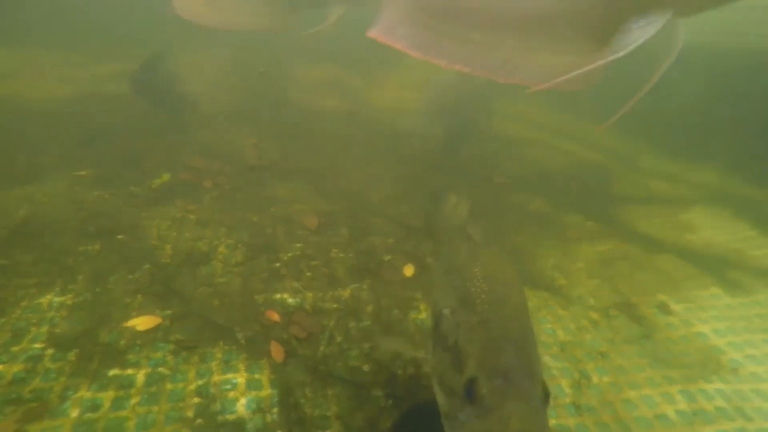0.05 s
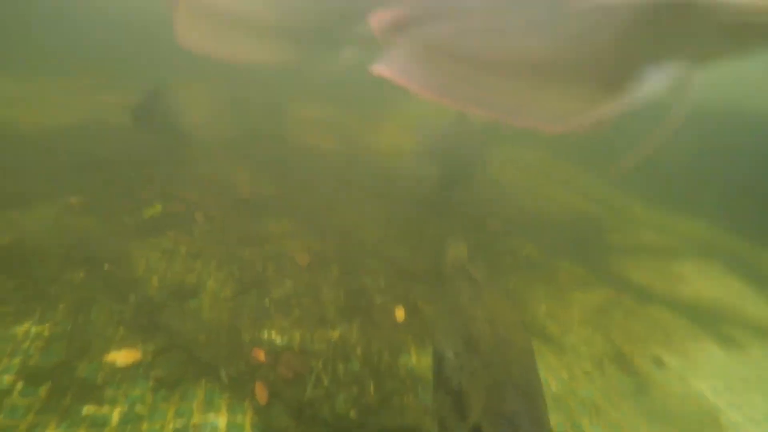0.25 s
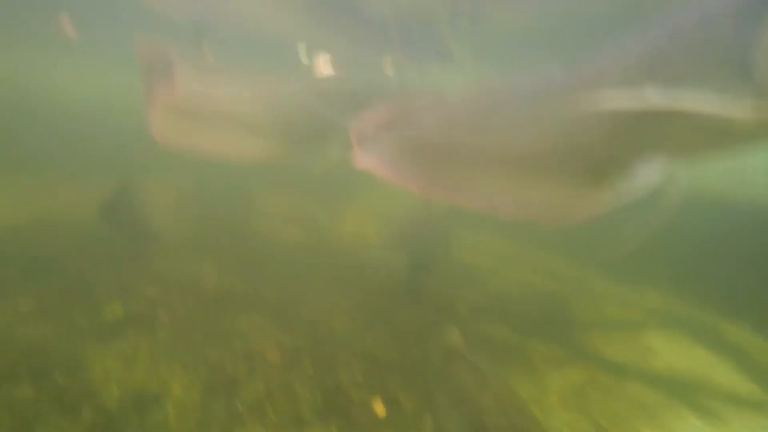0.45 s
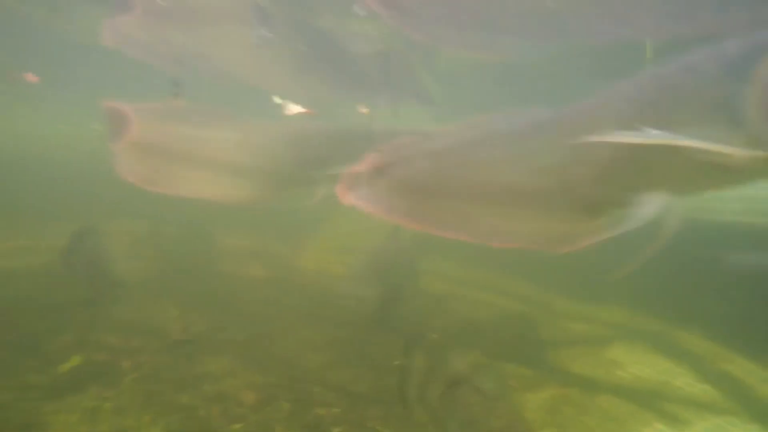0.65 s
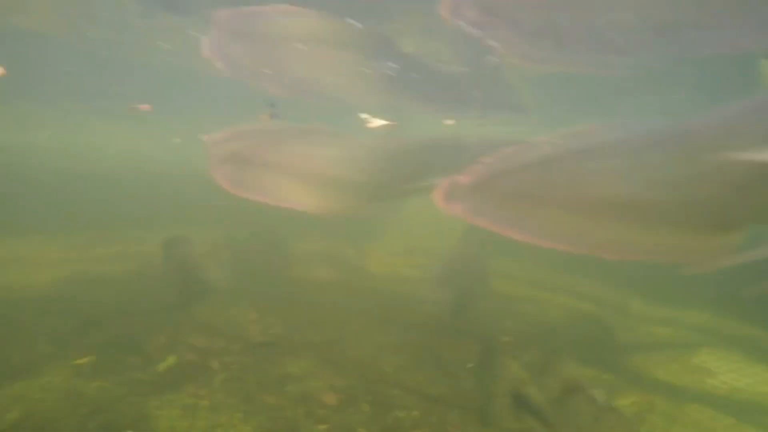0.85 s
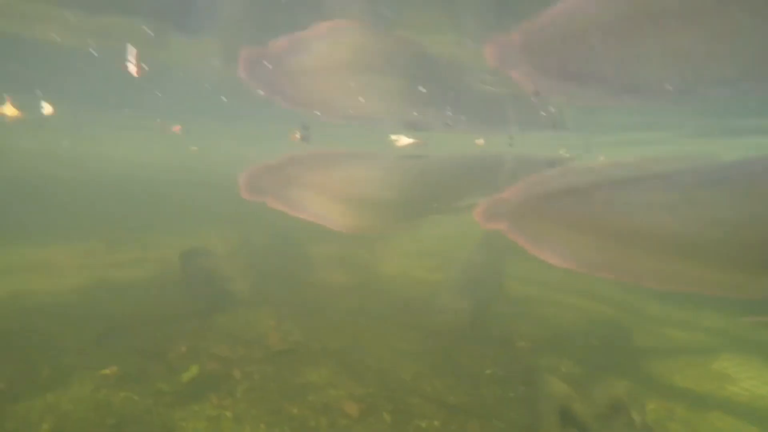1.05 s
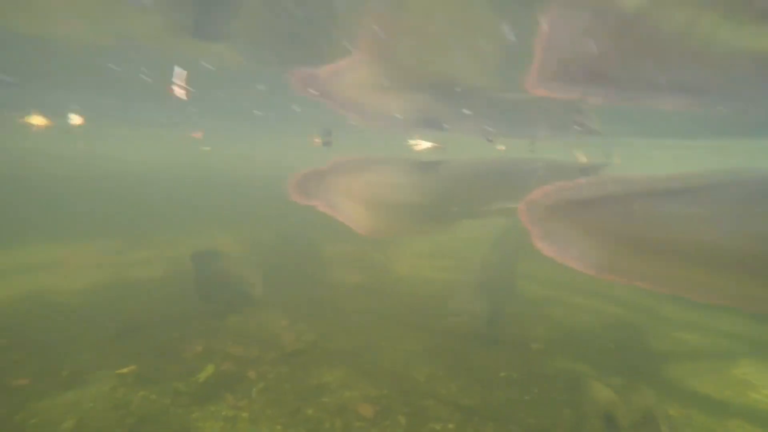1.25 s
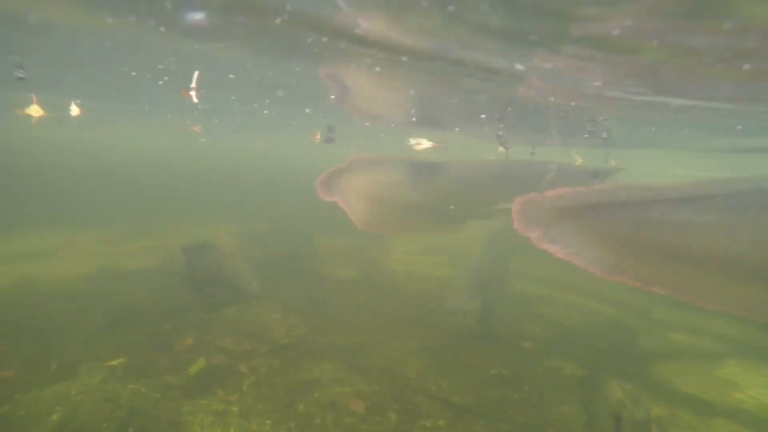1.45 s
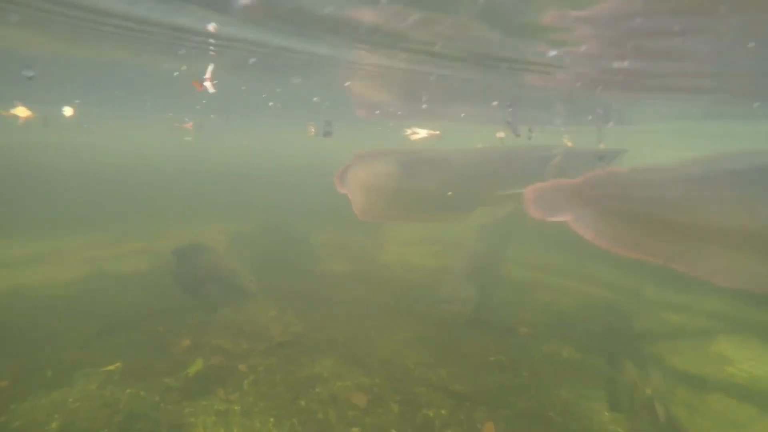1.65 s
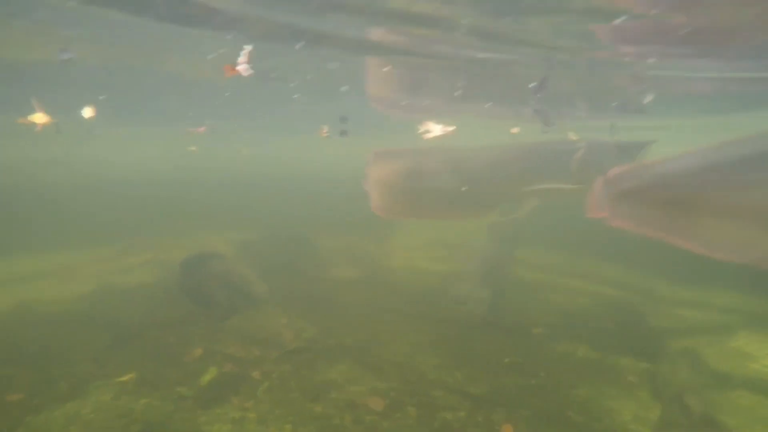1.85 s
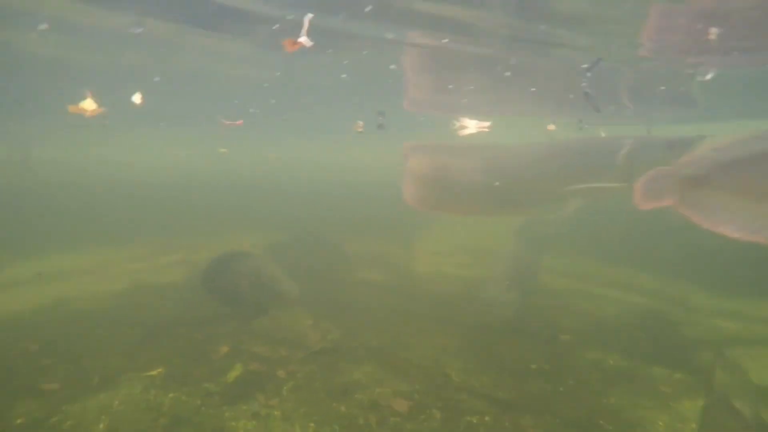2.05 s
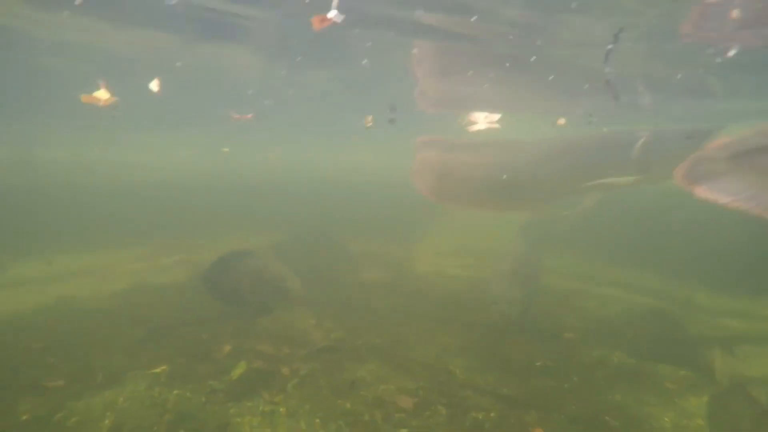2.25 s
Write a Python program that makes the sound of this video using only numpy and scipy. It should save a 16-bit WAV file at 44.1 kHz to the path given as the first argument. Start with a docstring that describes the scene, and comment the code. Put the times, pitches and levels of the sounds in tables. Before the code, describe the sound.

Underwater splashing hiss, narrow and watery, runs throughout a fish pond; a heavy low thump and a cluster of housing knocks, rubs and clicks come early, then sparse ticks, heard by a submerged camera, nearly mono.

```python
"""Under the surface of a fish pond, heard by a camera in a plastic housing, nearly mono.
Far-off splashing is a noise hiss shaped by the pond's narrow resonances, with swells of nearer splashes.
Water pushing the housing rumbles as low noise and shoves it into slow, dying swings.
While the camera is turned the mount knocks and slips, as dying modes, and rubs, as band-filtered grit.
A few sharp ticks ring bright modes; tiny bubbles are short fluttering sines."""
import sys
import numpy as np
from scipy import signal
from scipy.fft import rfft, irfft
from scipy.io import wavfile
from scipy.ndimage import uniform_filter1d

SR = 44100
rng = np.random.default_rng(int(sys.argv[2]) if len(sys.argv) > 2 else 0)


def inscribe(sig):
    """Save sig as 16-bit PCM at rate SR to the path in sys.argv[1].

    A 1-D sig is mono; a 2-D sig holds one channel per row.
    Samples are clipped to [-1, 1] before scaling.
    """
    pcm = np.round(np.clip(np.atleast_2d(sig).T, -1, 1) * 32767)
    wavfile.write(sys.argv[1], SR, pcm.astype(np.int16))


def boost(x):
    """Linear amplitude factor 10**(x/20) for a level x in decibels (scalar or array-like)."""
    u = np.asarray(x, float) / 20
    return 10 ** u


N = 101429  # length in samples

# relative spectrum of the splashing treble, far and near: freq_hz [Hz], density_db [dB per Hz]
TREBLE_SPECTRUM = [(2290, -13.5), (3900, -28), (4520, 0.5), (5170, -9), (5920, -9), (7760, -14.5),
                   (9770, -14.5), (13300, -29.5), (15000, -35)]


def evened(x):
    """Scales a signal to an rms of 1."""
    return x / np.sqrt(np.mean(x ** 2) + 1e-20)


def read(points, hz):
    """Reads a spectrum table at the frequencies hz, interpolating over log frequency."""
    f, value = np.transpose(points)
    return np.interp(np.log(hz + 1), np.log(f + 1), value)


def curve(rows, column):
    """Interpolates one column of a time table to every sample."""
    rows = np.array(rows)
    return np.interp(np.arange(N) / SR, rows[:, 0], rows[:, column])


def add(mix, s, sound):
    """Mixes a sound in from time s, cutting it at the end of the mix."""
    part = mix[round(s * SR):][:len(sound)]
    part += sound[:len(part)]


def noise(colour_db, size, patchy_db, flicker_db):
    """Noise of rms 1 from random short-time spectra, with drifting patches and a flicker shared by all bins."""
    hop = size // 4
    frames, hz = N // hop + 5, np.fft.rfftfreq(size, 1 / SR)
    real, imag, patches = rng.standard_normal((frames, len(hz), 3)).T
    patches = uniform_filter1d(patches, size=size // 64, axis=0)  # across frequency
    patches = evened(uniform_filter1d(patches, size=4096 // size, axis=1))  # across time
    flicker = evened(uniform_filter1d(rng.standard_normal(frames), size=2))
    bin_db = colour_db(hz)[:, None] + patchy_db * patches + flicker_db * flicker
    spectra = (real + 1j * imag) * boost(bin_db)
    return evened(signal.istft(spectra, nperseg=size, noverlap=size - hop)[1][:N])


def ring(modes, rise_s):
    """Struck modes (Hz, dB, t60 s): sines that die exponentially after a short rise."""
    t = np.arange(SR // 4) / SR
    rise = (1 - np.exp(-t / rise_s)) ** 2
    return rise * sum(boost(db - 60 * t / t60) * np.sin(2 * np.pi * hz * t) for hz, db, t60 in modes)


def hiss():
    """Distant splashing: a noise body lifted at the pond's resonances, and a flickering treble."""
    # level of the body: time_s [s], level_db [dB]
    hiss_level = [(0, -44), (.12, -46), (.28, -43.5), (.6, -43.5), (.92, -44.5), (1.12, -48.5),
                  (1.3, -47.5), (1.75, -51), (1.88, -47), (2.1, -45), (2.3, -45.5)]
    # relative spectrum of the body ahead of the resonances: freq_hz [Hz], density_db [dB per Hz]
    body_spectrum = [(90, -75), (160, -29), (240, -18.5), (580, -17), (1280, -29.5), (1600, -17),
                     (2340, -10), (2960, 0), (3700, -5.5), (4200, -19), (5500, -37.5)]
    # narrow resonances of the water column: freq_hz [Hz], lift_db [dB]
    pond_resonances = [(1520, 16.5), (1830, 7.5), (1980, 12), (2110, 7.5), (2260, 13), (2420, 16.5),
                       (2590, 14.5), (2710, 12.5), (3050, 8), (3190, 13)]
    width_hz = 36  # of each resonance, where its lift in dB has halved
    treble_db, treble_follow = -59, 0.53  # mean level; share of the body's swells in dB that it follows

    def body_colour(hz):
        lift = sum(db / (1 + ((hz - f) / (width_hz / 2)) ** 2) for f, db in pond_resonances)
        return read(body_spectrum, hz) + lift

    body = noise(body_colour, size=4096, patchy_db=1.6, flicker_db=.9)
    lumps = evened(uniform_filter1d(rng.standard_normal(N), size=500))  # quick unevenness of the body
    treble = noise(lambda hz: read(TREBLE_SPECTRUM, hz), size=512, patchy_db=3.0, flicker_db=2.5)
    level_db = curve(hiss_level, column=1)
    swell_db = level_db - level_db.mean()
    return boost(level_db + 1.05 * lumps) * body + boost(treble_db + treble_follow * swell_db) * treble


def rumble():
    """Slow water pressure on the housing: low noise under a level curve."""
    # level of the rumble: time_s [s], level_db [dB]
    rumble_level = [(0, -44), (.2, -40.5), (.32, -32), (.7, -28), (.97, -34.5), (1.2, -39.5), (1.75, -41),
                    (2.1, -38), (2.3, -48.5)]
    # relative spectrum of the pressure noise: freq_hz [Hz], density_db [dB per Hz]
    rumble_spectrum = [(7, -18), (14, 4), (33, -3.5), (65, -12.5), (128, -31.5), (200, -36.5), (400, -81)]
    pressure = noise(lambda hz: read(rumble_spectrum, hz), size=4096, patchy_db=2.86, flicker_db=-2.5)
    return boost(curve(rumble_level, column=1)) * pressure


def side_noise():
    """Faint flickering noise that is opposite in the two channels, unrelated to the middle."""
    # relative spectrum of the channel difference: freq_hz [Hz], density_db [dB per Hz]
    side_spectrum = [(30, -16), (940, -22), (2900, -1.5), (4600, -12), (13000, -20)]
    side_db = -67
    return boost(side_db) * noise(lambda hz: read(side_spectrum, hz), size=1024, patchy_db=0.0, flicker_db=7.0)


def fizz():
    """Many faint bubbles at random moments, sixteen pitches, the higher ones shorter and weaker."""
    rate_per_s, base_db = 150, -63  # base level at 4000 Hz, ahead of the random lift
    lift_db = 2.4 * np.minimum(rng.exponential(1, N), 4)
    strength = boost(lift_db) * (rng.random(N) < rate_per_s / SR)
    kind = rng.integers(0, 16, N)
    pitches = np.geomspace(2400, 9500, num=16)
    layers = []
    for k, hz in enumerate(pitches):
        pop = bubble(base_db - 5 * np.log2(hz / 4000), hz, 22 / hz)
        layers.append(signal.oaconvolve(strength * (kind == k), pop)[:N])
    return sum(layers)


def bubble(db, hz, length):
    """A small bubble: a sine that swells for a third of length (s) and dies, fluttering in level and phase."""
    u = np.arange(round(2 * length * SR)) / SR / length
    flutter = evened(uniform_filter1d(rng.standard_normal(2048), size=60))[:len(u)]
    envelope = 8 * u * np.exp(-3 * u) * (1 + 0.3 * flutter)
    return boost(db) * envelope * np.sin(2 * np.pi * hz * length * u + .3 * flutter)


def splashes():
    """Nearer splashes that brighten the hiss: short bell-shaped swells of gritty treble."""
    # swells: middle_s [s], level_db [dB at the middle]
    near_splashes = [(0.14, -58), (0.353, -55), (0.474, -51.5), (.85, -57), (1.0, -55.5)]
    width_s = 0.081  # between the points where a swell is exp(-2) of its peak
    t = np.arange(N) / SR
    swell = sum(boost(db) * np.exp(-2 * (2 * (t - s) / width_s) ** 2) for s, db in near_splashes)

    def bright(hz):
        return read(TREBLE_SPECTRUM, hz) + 3 * np.log2(hz / 5000 + .01)

    return swell * noise(bright, size=256, patchy_db=3.5, flicker_db=2.5)


def crack(table, db, tilt_db=0):
    """Bright modes of alternating sign, detuned a little from blow to blow, with no bass."""
    detune = 1 + .012 * rng.uniform(-1, 1, len(table))
    modes = 0
    for k, (f, g, t60) in enumerate(table):
        mode_db = db + g + tilt_db * np.log2(f / 3600)
        modes = modes + (-1) ** k * ring([(f * detune[k], mode_db, t60)], rise_s=0.00018)
    return signal.sosfilt(signal.butter(4, 650, "high", fs=SR, output="sos"), modes)


def tick(db, tilt_db):
    """A lone tick: a crack and its short, brighter scatter through the pond, a convolved noise tail."""
    # modes a tick rings with, ahead of detuning: freq_hz [Hz], relative_db [dB], t60_s [s]
    tick_modes = [(990, -12, 0.003), (2720, 1.5, 0.0063), (3740, -0.5, 0.01), (4580, -3.5, 0.0085),
                  (5620, -14, 0.01), (6940, -19.5, 0.0067), (8120, -9.5, 0.011), (9150, -8.5, 0.0069),
                  (10380, -6, 0.0042), (11920, -19.5, 0.0055)]
    tail_t60_s, tail_db = 0.09, -32.5
    t = np.arange(SR // 8) / SR
    hit = crack(tick_modes, db, tilt_db)
    scatter = boost(tail_db - 60 * t / tail_t60_s) * rng.standard_normal(len(t))
    return hit + signal.fftconvolve(np.diff(hit), scatter)[:len(hit)]  # the difference brightens the tail


def knock(db, hz, t60, body_db, crack_db):
    """A knock on the housing: shell modes, the low ones by how full the blow is, and a crack on top."""
    # shell modes: pitch_ratio [of the knock's pitch], relative_db [dB], t60_share [of the knock's t60]
    shell_modes = [(1, 4.5, 1), (0.564, 2, 0.7), (0.331, 3, 0.52)]
    # bright modes of the knocked housing, ahead of detuning: freq_hz [Hz], relative_db [dB], t60_s [s]
    crack_modes = [(2750, 2, 0.0081), (3550, 6.5, 0.0086), (4190, -5.5, 0.011), (6240, -3.5, 0.0044),
                   (11000, -15, 0.0038)]
    lid_hz, lid_db, lid_t60_s = 1428, -10.5, 0.046  # keeps its pitch wherever the blow lands; dB to the knock
    shell = [(hz * k, db + g + body_db * (k < 1), t60 * share) for k, g, share in shell_modes]
    soft = ring(shell + [(lid_hz, db + lid_db, lid_t60_s)], rise_s=.00045)
    return soft + crack(crack_modes, crack_db)


def shove(db, hz, t60, way):
    """A shove of water: a low, dying swing of the housing that starts fast and slows to its pitch."""
    sag, sag_s = 0.7, 0.0032  # starts this share above its pitch; time constant of sinking to it
    t = np.arange(SR // 3) / SR
    turns = hz * (t + sag * sag_s * (1 - np.exp(-t / sag_s)))
    rise = (1 - np.exp(-t / 0.0015)) ** 2
    return np.sign(way) * rise * boost(db - 60 * t / t60) * np.sin(2 * np.pi * turns)


def rub(length, db, tilt_db):
    """A rub along the housing: uneven grit under one stroke, through a dull band; bright rubs squeak."""
    low_hz, high_hz, grit_per_s = 120, 2300, 700
    squeak_hz, squeak_width_hz = 1850, 69  # width is to one side, where the squeak in dB has halved
    squeak_lift = 4.7  # dB for each dB per octave of brightness
    n = round(length * SR)
    draw = rng.random((2, SR // 8))
    grains = (draw[0] < grit_per_s / SR) * (draw[1] - .5)
    grit = grains + 0.083 * rng.standard_normal(SR // 8)
    hz = np.fft.rfftfreq(SR // 8, 1 / SR) + 1
    squeak = squeak_lift / (1 + ((hz - squeak_hz) / squeak_width_hz) ** 2) * (tilt_db > 0)
    band = boost(tilt_db * (np.log2(hz / 600) + squeak))
    band = band / np.sqrt((1 + (low_hz / hz) ** 4) * (1 + (hz / high_hz) ** 8))
    stroke = np.sin(np.pi * np.arange(n) / n) ** 0.41
    return boost(db) * evened(irfft(rfft(grit) * band))[:n] * stroke


def slip(db):
    """A slip of the mount: a quick jerk that rings four damped modes."""
    # modes of the mount: freq_hz [Hz], relative_db [dB], t60_s [s]
    mount_modes = [(131, 1.9, 0.018), (300, -7, 0.0078), (646, -3, 0.012), (1240, 4, 0.0017)]
    return boost(db) * ring(mount_modes, rise_s=0.00032)


def scene():
    """All sources in the middle, with a faint unrelated difference between the channels."""
    # small bubbles: start_s [s], level_db [dB], pitch_hz [Hz]
    bubble_events = [(0.034, -42.5, 5750), (0.6775, -36, 3920), (1.095, -46.5, 4800), (1.345, -43, 4380),
                     (1.598, -47, 4760)]
    # moments of lone ticks: start_s [s]
    tick_starts = [.1738, 1.054, 1.8008]
    # the ticks in the same order: level_db [dB], brightness [dB per octave]
    tick_sounds = [(-28, -4.5), (-36.5, -5), (-17.5, 0)]
    # knocks: start_s [s], level_db [dB], pitch_hz [Hz], t60_s [s], low_modes_db [dB], crack_db [dB]
    knock_events = [(0.2484, -25, 1233, 0.034, -0.5, -35), (0.5095, -17, 1134, 0.038, 0, -28.5),
                    (0.6543, -20.5, 1283, 0.028, -6, -32.5), (1.1462, -18, 1196, 0.046, -7.5, -22)]
    # shoves and low swings: start_s [s], level_db [dB], pitch_hz [Hz], t60_s [s], way [+1 in, -1 out]
    shove_events = [(0.251, -5.5, 34.3, 0.064, -1), (0.433, -21, 40.4, 0.28, 1),
                    (0.513, -14, 42, 0.053, -1), (0.573, -36, 36.7, 0.47, 1), (0.654, -15.5, 63, 0.063, -1),
                    (0.742, -18.5, 19.65, 0.8, 1), (1.147, -25.5, 110, 0.056, 1),
                    (1.148, -32.5, 307, 0.071, 1)]
    # rubs: start_s [s], length_s [s], level_db [dB], brightness [dB per octave]
    rub_events = [(0.262, 0.073, -43.5, 2), (0.436, 0.12, -46, -3), (0.557, 0.085, -55, 0),
                  (0.657, 0.038, -35.5, -4.5), (0.702, 0.055, -42.5, -7), (0.833, 0.04, -49.5, 1.5)]
    # slips of the mount: start_s [s], level_db [dB]
    slip_events = [(0.5054, -22), (0.585, -31), (0.6676, -15), (0.6761, -19.5), (0.7191, -20),
                   (0.733, -21.5), (0.8616, -27), (0.941, -39.5)]

    mid = hiss() + splashes() + rumble() + fizz()
    for s, *row in bubble_events:
        add(mid, s, bubble(*row, length=0.0083))
    for s, row in zip(tick_starts, tick_sounds):
        add(mid, s, tick(*row))
    for s, *row in knock_events:
        add(mid, s, knock(*row))
    for s, *row in shove_events:
        add(mid, s, shove(*row))
    for s, *row in rub_events:
        add(mid, s, rub(*row))
    for s, db in slip_events:
        add(mid, s, slip(db))
    side = side_noise()
    return np.array([mid + side, mid - side])


def low_pass(x):
    """Removes everything above the highest recorded frequency."""
    return signal.sosfilt(signal.butter(12, 15560, fs=SR, output="sos"), x)


def record(dry):
    """Takes the finished mix down as it reaches the camera."""
    return low_pass(dry)


dry = scene()
out = record(dry)
inscribe(out)
```